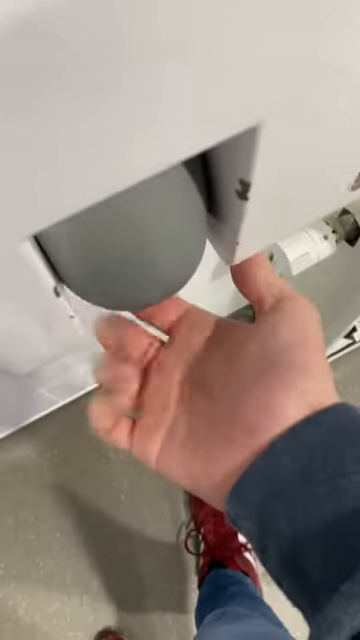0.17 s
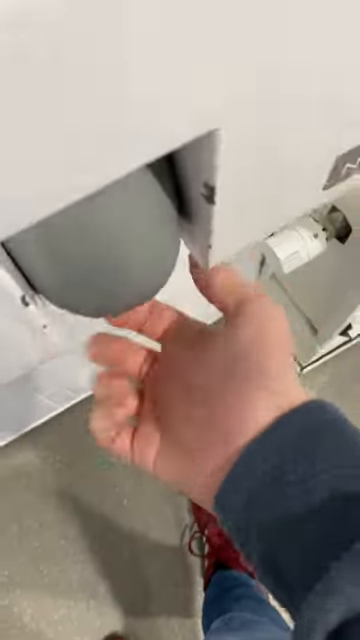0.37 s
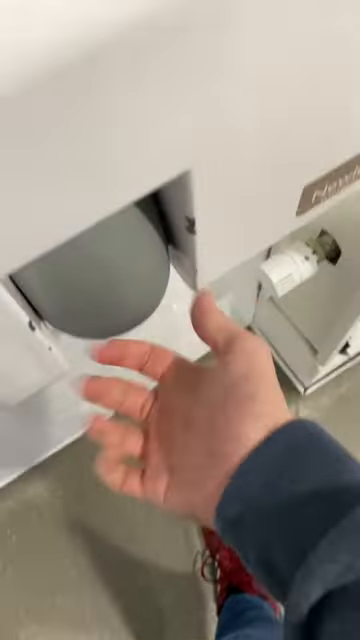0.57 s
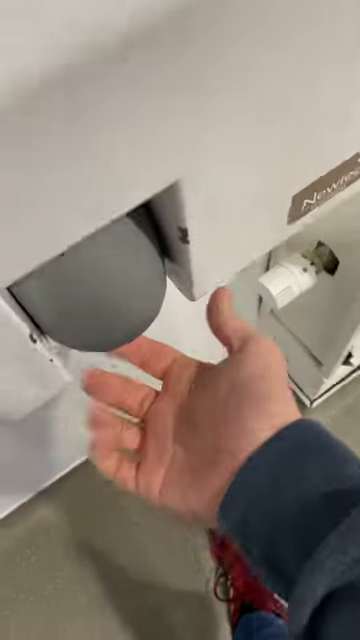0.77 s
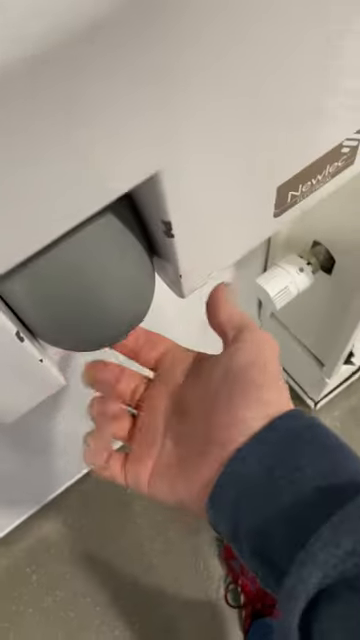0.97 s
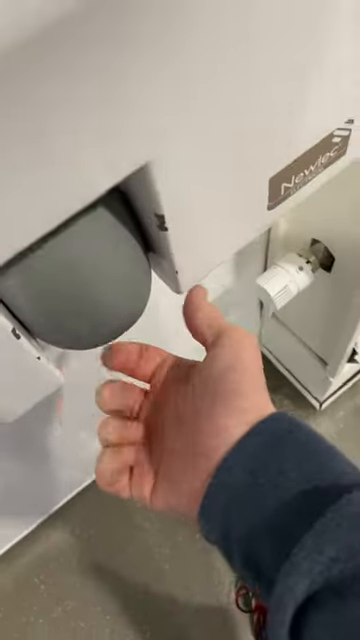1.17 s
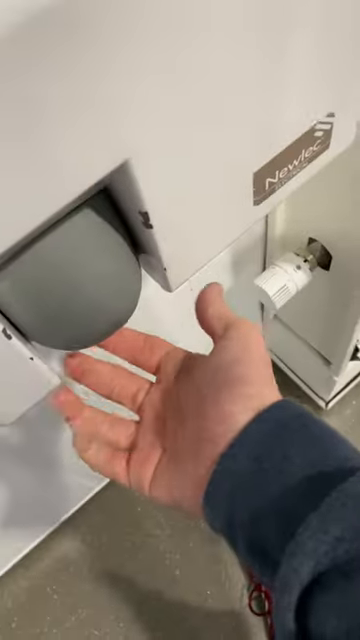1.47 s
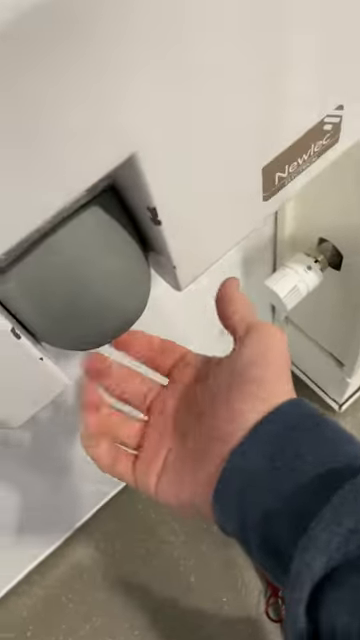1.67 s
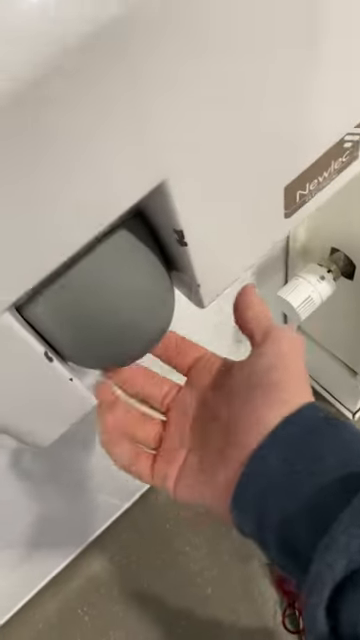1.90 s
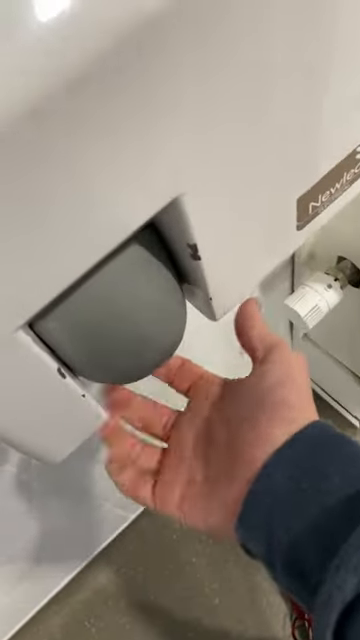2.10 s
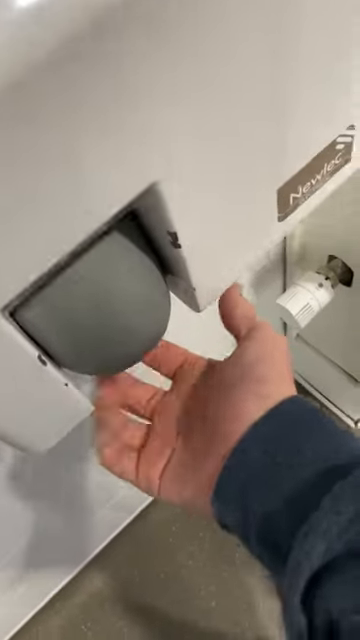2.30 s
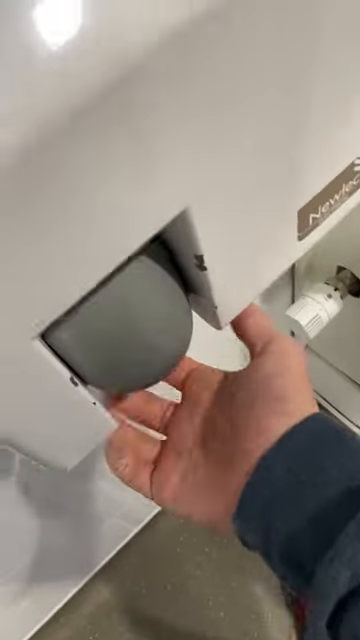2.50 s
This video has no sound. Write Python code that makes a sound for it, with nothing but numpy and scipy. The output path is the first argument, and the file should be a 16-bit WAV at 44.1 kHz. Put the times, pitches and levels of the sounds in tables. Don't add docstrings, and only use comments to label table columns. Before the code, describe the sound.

A hand dryer clicks on, roars loudly over a waving hand, then switches off and winds down

```python
import sys
import numpy as np
from scipy import signal
from scipy.fft import rfft, irfft, next_fast_len
from scipy.io import wavfile
from scipy.ndimage import uniform_filter1d, map_coordinates

SR = 44100
rng = np.random.default_rng(int(sys.argv[2]) if len(sys.argv) > 2 else 0)


def wav_record(signal):
    frames = np.transpose(np.atleast_2d(signal))
    bounded = np.clip(frames, -1, 1)
    quanta = np.round(bounded * 32767).astype(np.int16)
    wavfile.write(sys.argv[1], SR, quanta)


def decibels_to_gain(level_db):
    exponent = np.asarray(level_db, float) / 20
    return 10 ** exponent


N = 116865


def unit(x):
    return x / np.sqrt(np.mean(x ** 2) + 1e-20)


def along(points, hz):
    f, v = np.transpose(points)
    return np.interp(np.log(hz + 1), np.log(f + 1), v)


def curve(rows):
    return np.interp(np.arange(N) / SR, *np.transpose(rows))


def wobble(rate):
    knots = rng.standard_normal(int(N * rate / SR) + 4)
    return map_coordinates(knots, [np.arange(N) * rate / SR])


def swell(start_s, long_s):
    return np.sin(np.pi * np.clip((np.arange(N) / SR - start_s) / long_s, 0, 1))


def filtered(x, response):
    m = next_fast_len(N + SR // 2)
    return irfft(rfft(x, m) * response(np.fft.rfftfreq(m, 1 / SR)), m)[..., :N]


def peak(f, hz, width_hz):
    return 1j * f * width_hz / (hz * hz - f * f + 1j * f * width_hz)


def modes(table):
    return lambda f: np.sqrt(sum(abs(decibels_to_gain(db) * peak(f, hz, w) ** 2) ** 2 for hz, w, db in table))


def colour(points):
    return lambda f: decibels_to_gain(along(points, f)) * (f < points[-1][0] * 1.01) * (f > points[0][0])


def rush(response, patchy_db):
    z = signal.stft(rng.standard_normal((2, N + 512)), nperseg=512)[2]
    field = uniform_filter1d(rng.standard_normal(z.shape[1:]), size=6, axis=0)
    field = uniform_filter1d(field, size=8, axis=1)
    noise = signal.istft(z * decibels_to_gain(patchy_db * unit(field)), nperseg=512)[1][:, :N]
    return unit(filtered(noise, response))


# f/Hz, level/dB [dB per Hz]
ROOM = [(20, -30), (60, -22), (200, -1), (400, -16), (1000, -17), (2500, -19), (9000, -24), (15500, -39)]


def room_tone():
    return decibels_to_gain(-50.5) * rush(colour(ROOM), patchy_db=-4)


# f/Hz, level/dB [dB per Hz]
RELAY = [(600, -40), (2300, -2), (4000, -3), (6500, -2), (10000, -6), (15700, -11)]


def relay():
    start_s, long_s, level_db = .029, .014, -39.5
    u = np.maximum(np.arange(N) / SR - start_s, 0) / long_s
    return decibels_to_gain(level_db) * 3 * u * np.exp(-(2 * u) ** 2) * rush(colour(RELAY), patchy_db=0)


# t/s [start], length [s], f/Hz, level/dB [peak]
PANEL = [(0.19, 0.076, 95, -25.5), (.185, 0.084, 225, -25.5), (0.27, .1, 245, -21),
         (0.195, 0.052, 420, -37), (0.433, 0.18, 252.4, -15.5), (0.636, 0.25, 215, -18),
         (0.85, 0.17, 177.1, -23.5), (0.863, 0.43, 272, -22.5), (1.12, 0.24, 219, -17),
         (1.295, 0.15, 407.4, -19.5), (1.402, 0.41, 215.9, -18), (1.42, 0.19, 274.8, -21),
         (1.757, 0.081, 270, -19), (1.97, 0.336, 213.2, -18)]


def panel():
    t = np.arange(N) / SR
    notes = 0
    for start_s, long_s, hz, db in PANEL:
        level = decibels_to_gain(db + 2.76 * wobble(19.76)) * np.abs(swell(start_s, long_s)) ** .5
        drift_rad = 1.1 * wobble(18)
        notes = notes + level * np.sin(2 * np.pi * hz * t + drift_rad)
    return notes * [[1], [0]]


BUZZ_ON_S = 0.046
# t/s [start], length [s], f/Hz, level/dB
START_HUM = [
    (.04, .07, 214, -33),
    (.095, .085, 218, -25),
    (.064, .036, 432, -20),
    (.11, .06, 545, -32),
]


def start_hum():
    t = np.maximum(np.arange(N) / SR - BUZZ_ON_S, 0)
    hum = 0
    for start_s, long_s, hz, db in START_HUM:
        tone = np.sin(2 * np.pi * hz * t + 0.43 * wobble(37.6))
        hum = hum + decibels_to_gain(db) * swell(start_s, long_s) * tone
    return hum * [[1], [0]]


# f/Hz, width [Hz], level/dB
START_BUZZ = [(340, 300, 6), (1080, 380, -3), (1750, 260, -16), (2400, 260, -10)]


def start_buzz():
    rise_s, t60_s, level_db = 0.023, 0.74, -25.5
    t = np.maximum(np.arange(N) / SR - BUZZ_ON_S, 0)
    level = decibels_to_gain(level_db - 60 * t / t60_s) * (1 - np.exp(-t / rise_s))
    return level * rush(modes(START_BUZZ), patchy_db=-1.7)


# t/s, level/dB
SHAKE = [(0, -38), (.037, -35), (.045, -11), (.08, -15.5), (.185, -10), (.21, -3), (.45, -0.5), (.9, -0.5),
         (1.2, 0.5), (1.6, -0.5), (1.9, 0.5), (2.2, -1.5), (2.3, -10), (2.65, -17)]


def motor_force_db():
    return curve(SHAKE)


# f/Hz, width [Hz], level/dB
CASE = [(101.5, 33, -11.5), (179.5, 25, -4), (224, 40, -2.5), (266, 43, -7.5), (399, 80, -11.5),
        (540, 156, -13.5)]


def case():
    level_db = -18 + motor_force_db() + 1.3 * wobble(12.17)
    return decibels_to_gain(level_db) * rush(modes(CASE), patchy_db=1.1)


# t/s [start], length [s], f/Hz, level/dB
FINGERS = [(0.136, 0.25, 2290, -34.5), (0.148, .27, 2480, -35.5), (.44, 0.17, 4900, -37),
           (0.59, 0.18, 2400, -32), (0.79, 0.097, 3950, -33.5), (.85, 0.34, 3450, -37.5),
           (.85, 0.35, 5050, -55), (1.593, 0.5, 3440, -36), (1.62, 0.27, 1216, -28.5),
           (1.646, 0.57, 1780, -33), (1.78, 0.44, 5300, -35.5), (0.295, 0.61, 556, -26.5),
           (1.844, 0.41, 574, -40), (2.197, 0.19, 1370, -40), (2.3, 0.36, 1880, -51),
           (2.36, 0.22, 1310, -44.5)]


def fingers():
    whistles = 0
    for start_s, long_s, hz, db in FINGERS:
        band = modes([(hz, .1 * hz, 0)])
        whistles = whistles + decibels_to_gain(db) * swell(start_s, long_s) * rush(band, patchy_db=-1.5)
    return whistles


# t/s, level/dB
FLOW = [(0, -51), (.036, -32), (.053, -21.5), (.11, -16.5), (.155, -10), (.18, -5.5), (.27, -2.5), (.45, 0),
        (.9, 2), (1.4, 0.5), (1.75, 1), (2.14, 0.5), (2.19, -3.5), (2.28, -8), (2.38, -11), (2.5, -16.5),
        (2.65, -19.5)]


def air_flow_db():
    return curve(FLOW)


# f/Hz, level/dB [dB per Hz]
RUMBLE = [(15, -60), (30, -26), (60, -5), (120, -3.5), (230, -5), (400, -3.5), (700, -10), (1500, -36)]


def rumble():
    push_db = (air_flow_db() + motor_force_db()) / 2
    level_db = -20.2 + .86 * push_db + 1.3 * wobble(30.14)
    return decibels_to_gain(level_db) * rush(colour(RUMBLE), patchy_db=0.74)


# f/Hz, level/dB [dB per Hz]
HISS = [(3000, -40), (5000, -4), (6600, 0), (8600, -.5), (10500, -6), (13000, -9), (15000, -16),
        (15750, -15.5)]


def hiss(flutter_db):
    level_db = -31 + 0.98 * air_flow_db() + 0.33 * flutter_db + 0.41 * wobble(300)
    return decibels_to_gain(level_db) * rush(colour(HISS), patchy_db=1.5)


# f/Hz, level/dB [dB per Hz]
JET = [(250, -25), (500, -0.5), (1000, -2.5), (2000, -10), (3000, -11), (4500, -16), (6000, -26),
       (9000, -62)]
# f/Hz, width [Hz], level/dB [lift]
DUCT = [(1275, 230, 3.5), (1712, 26, 6), (2420, 240, 0.5), (3114, 250, -4.5), (3190, 38, 6), (3450, 280, 1),
        (3950, 32, 4.5), (5030, 670, 4)]


def jet(flutter_db):
    def lift(factor):
        return lambda f: decibels_to_gain(factor * sum(db * abs(peak(f, hz, w)) ** 2 for hz, w, db in DUCT))

    flow_db = air_flow_db()
    stream = rush(colour(JET), patchy_db=1.43)
    slow = np.clip(flow_db / -8.5, 0, 1)
    full_sound = unit(filtered(stream, lift(1)))
    hollow_sound = unit(filtered(stream, lift(2.1)))
    nozzle = (1 - slow) * full_sound + slow * hollow_sound
    return decibels_to_gain(-22 + flow_db + flutter_db) * nozzle


def air():
    flutter_db = 0.26 * wobble(5.25) + 0.15 * wobble(18) + 0.24 * wobble(90)
    return rumble() + hiss(flutter_db) + jet(flutter_db)


def palm(scattered):
    start_s, long_s, hz = 1.2, 1, 855
    low = filtered(scattered, lambda f: abs(peak(f, hz, hz)) ** 2)
    return scattered + low * (decibels_to_gain(6.5 * swell(start_s, long_s)) - 1)


# f/Hz, likeness [0-1]
ALIKE = [(60, .975), (200, .995), (500, .93), (900, .68), (1300, .96), (2050, .998), (2900, .82),
         (4300, .82), (5200, .93), (6000, .84), (7400, .96), (9000, .82), (10600, .975), (12000, .8),
         (13700, .93), (15200, .78)]
# f/Hz, level/dB
LEFT = [(60, -1), (250, -2), (500, -7), (950, -6), (1300, 0), (2000, 0), (2800, -4), (3500, 0), (4300, -5),
        (5200, 0)]
# f/Hz, lead [radians]
LEAD = [(100, 0), (520, -.5), (1030, .8), (1500, .35), (2050, 0), (3000, .7), (3600, .25), (4300, .7),
        (5200, 0)]
# f/Hz, left leads [cycles]
TURNS = [(5200, 0), (5950, .25), (7450, .5), (8900, .75), (10650, 1), (12050, 1.25), (13700, 1.5),
         (15050, 1.7), (15400, 1.9)]


def ports(pair):
    def turn(f):
        return np.arccos(np.clip(along(ALIKE, f), 0, 1)) / 2

    def half_lead(f):
        path = 2 * np.pi * along(TURNS, f)
        dwell = .7 / 2 * np.sin(2 * path)
        return np.exp(.5j * (along(LEAD, f) + path - dwell))

    def left_right(f):
        half = half_lead(f)
        return np.array([decibels_to_gain(along(LEFT, f)) * half, 1 / half])

    same, other = filtered(pair, lambda f: np.array([np.cos(turn(f)), np.sin(turn(f))]))
    return filtered(np.array([same + other, same - other]), left_right)


def scene():
    click = relay()
    motor = panel() + start_hum() + start_buzz() + case()
    direct, scattered = room_tone() + click + motor + fingers() + air()
    heard = ports(np.array([direct, palm(scattered)]))
    return heard + .6 * click[::-1]


def low_pass(x):
    return signal.sosfilt(signal.butter(12, 16940, fs=SR, output="sos"), x)


def record(dry):
    held = dry / (1 + abs(dry / .98) ** 4) ** .25
    mix = filtered(held, lambda f: f < 15740)
    return low_pass(mix)


dry = scene()
out = record(dry)
wav_record(out)
```